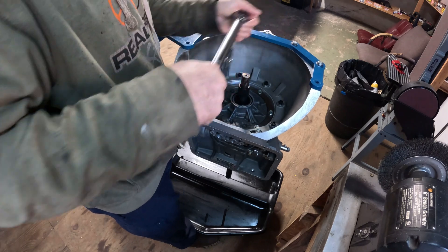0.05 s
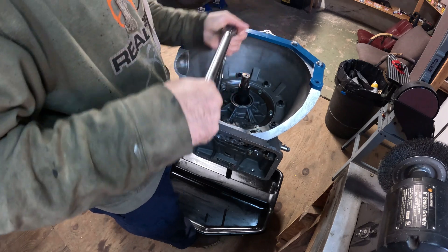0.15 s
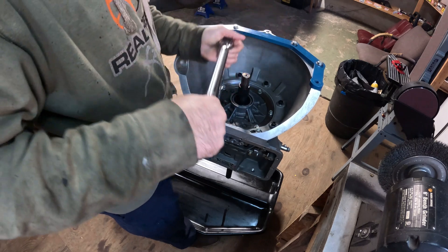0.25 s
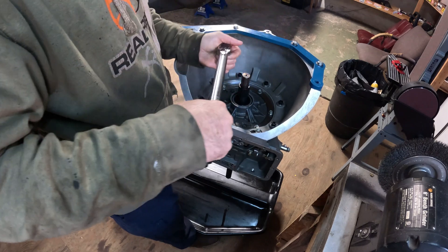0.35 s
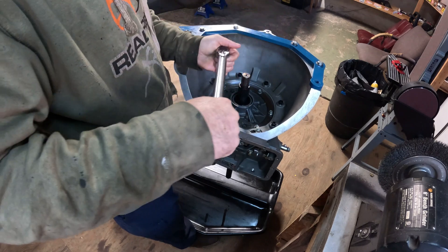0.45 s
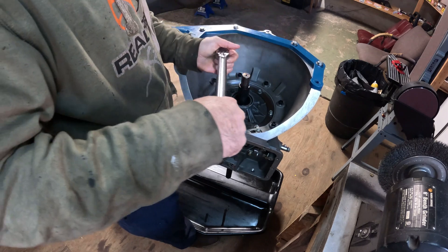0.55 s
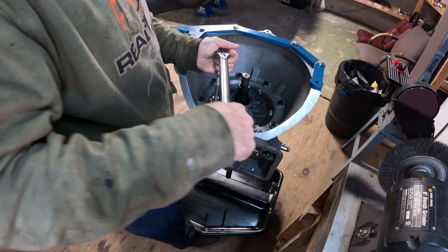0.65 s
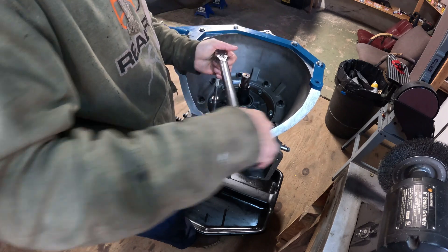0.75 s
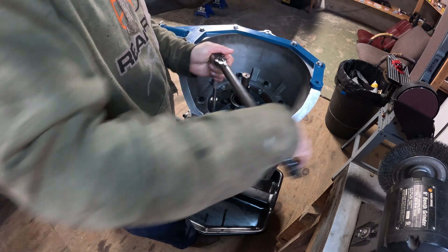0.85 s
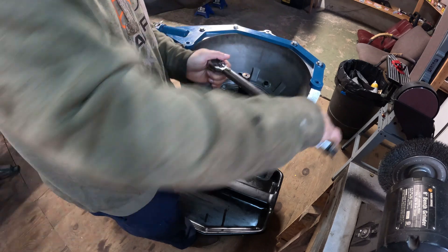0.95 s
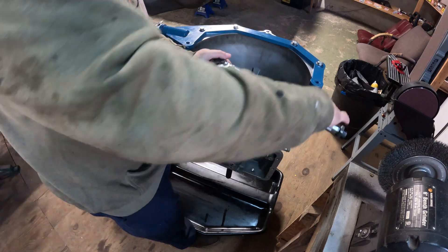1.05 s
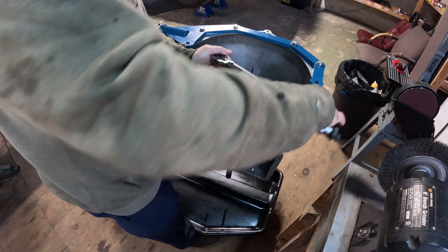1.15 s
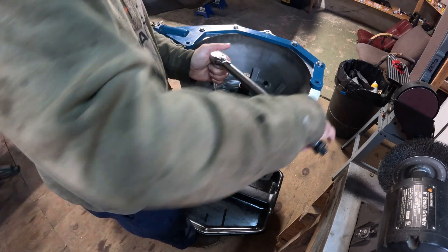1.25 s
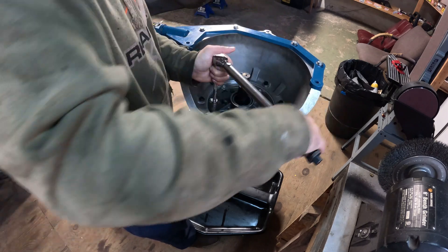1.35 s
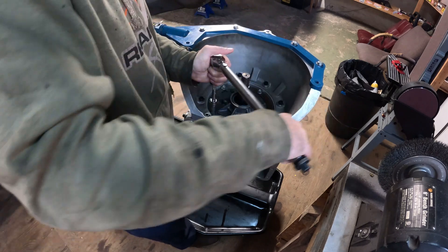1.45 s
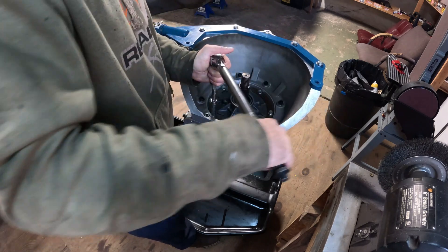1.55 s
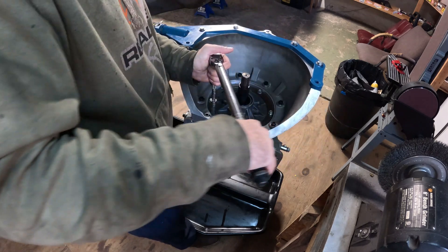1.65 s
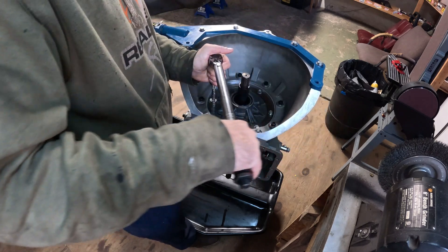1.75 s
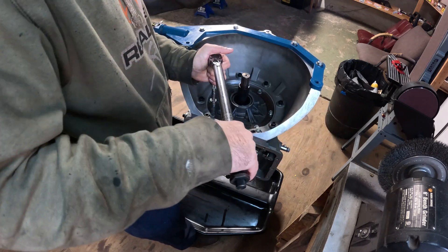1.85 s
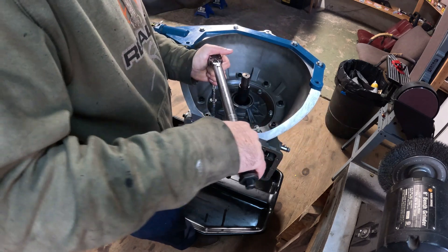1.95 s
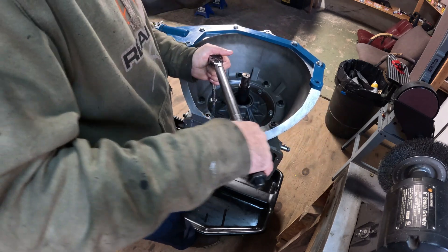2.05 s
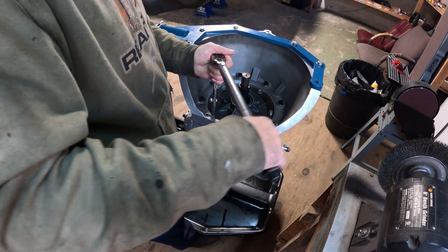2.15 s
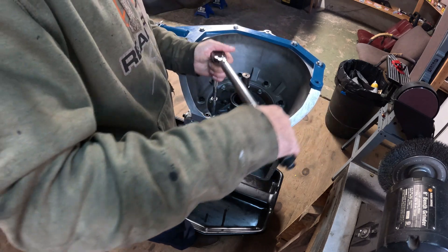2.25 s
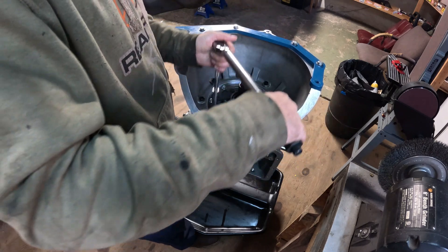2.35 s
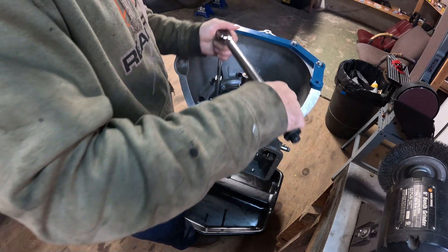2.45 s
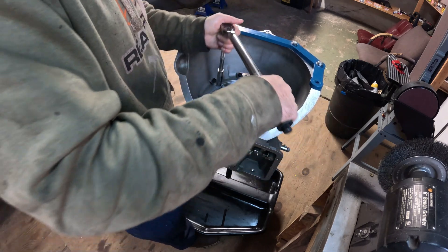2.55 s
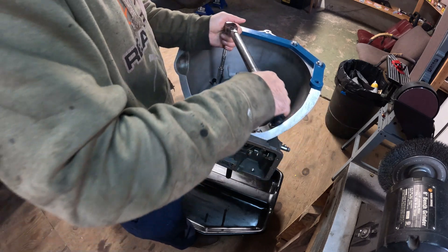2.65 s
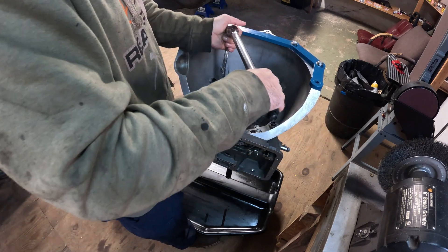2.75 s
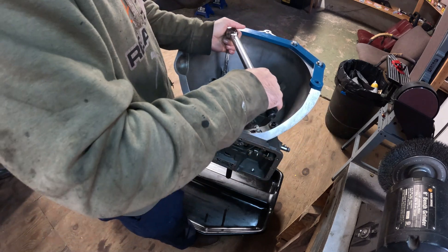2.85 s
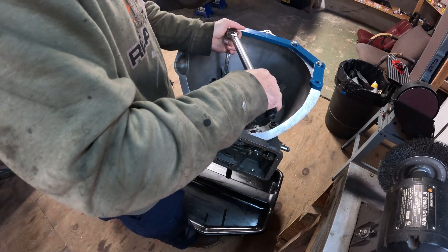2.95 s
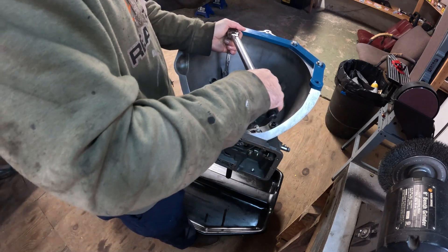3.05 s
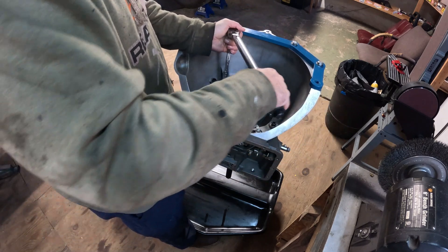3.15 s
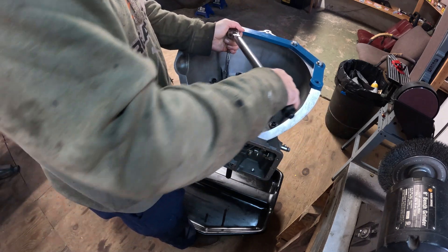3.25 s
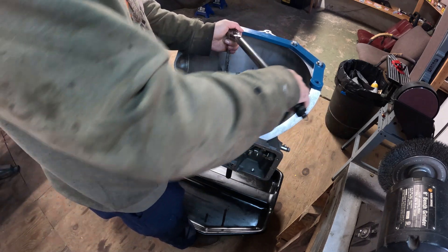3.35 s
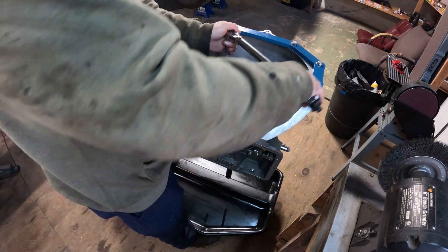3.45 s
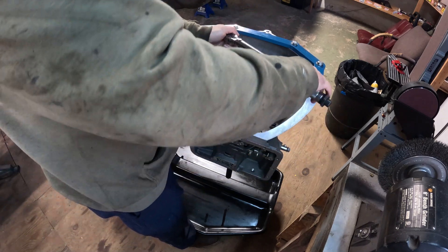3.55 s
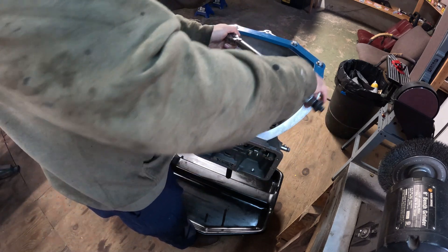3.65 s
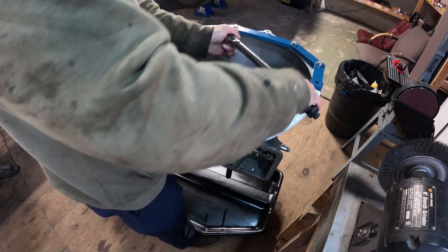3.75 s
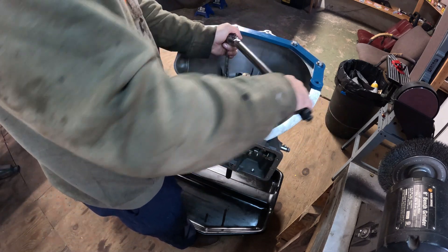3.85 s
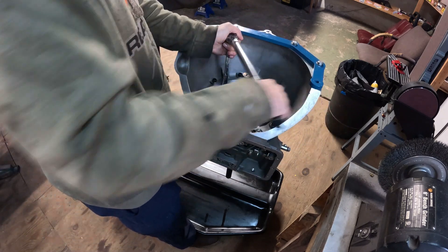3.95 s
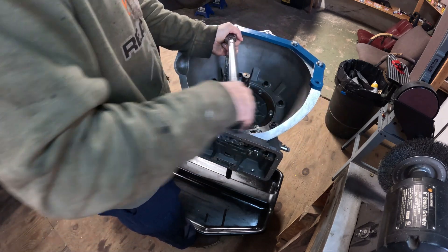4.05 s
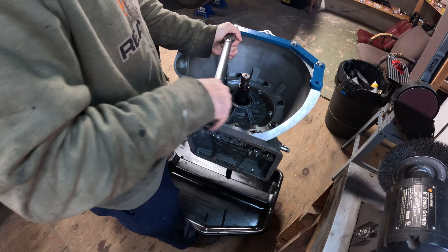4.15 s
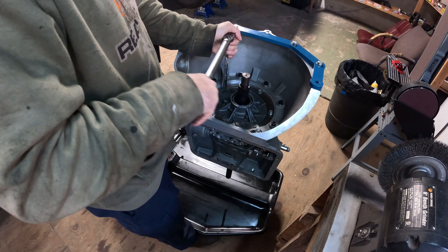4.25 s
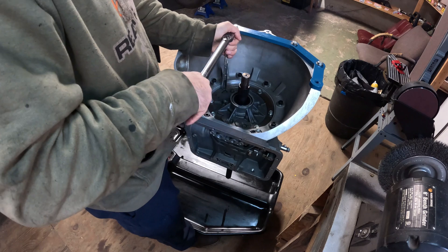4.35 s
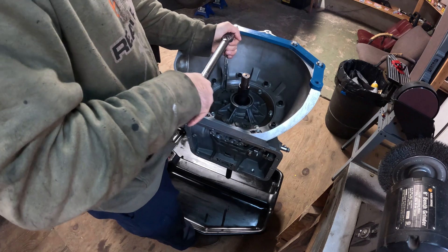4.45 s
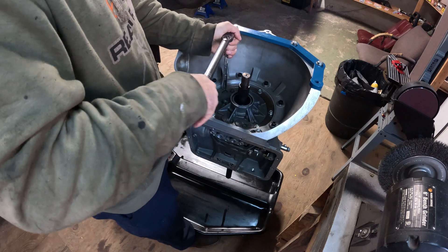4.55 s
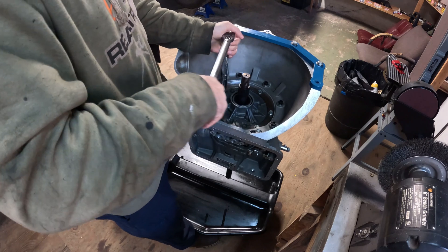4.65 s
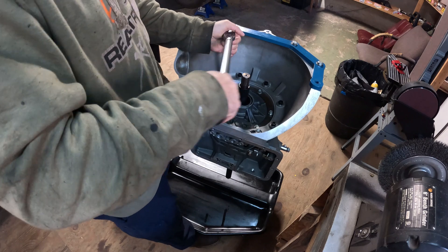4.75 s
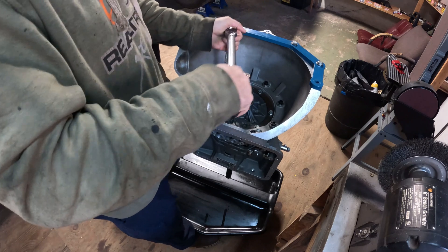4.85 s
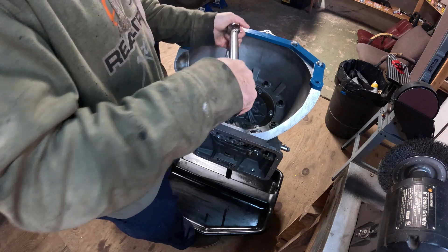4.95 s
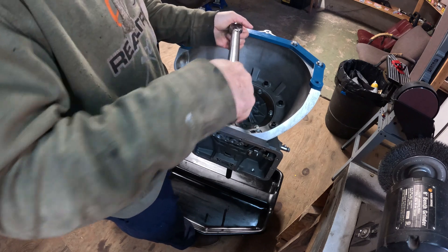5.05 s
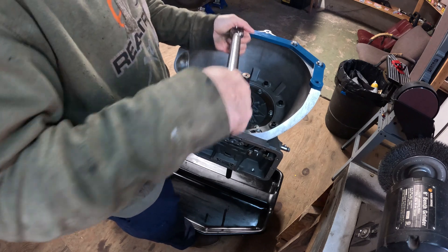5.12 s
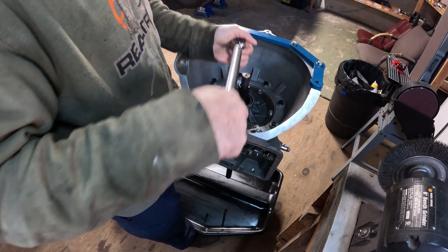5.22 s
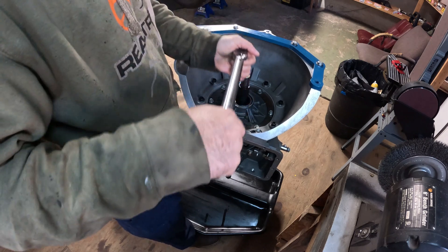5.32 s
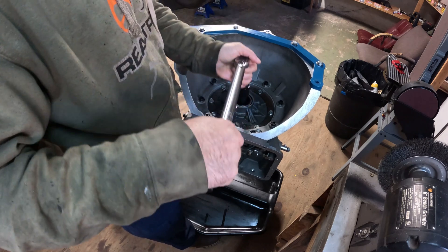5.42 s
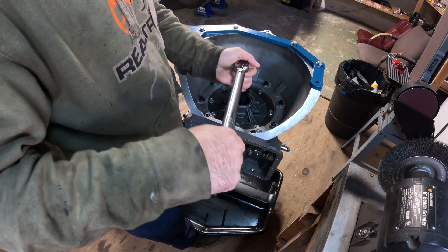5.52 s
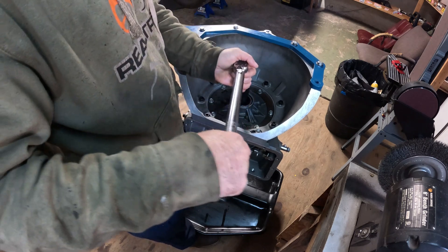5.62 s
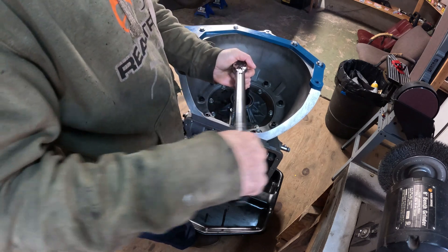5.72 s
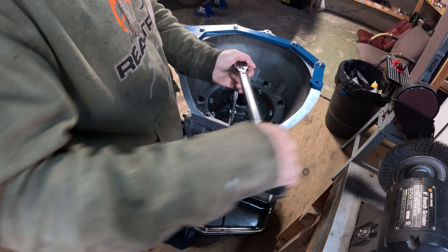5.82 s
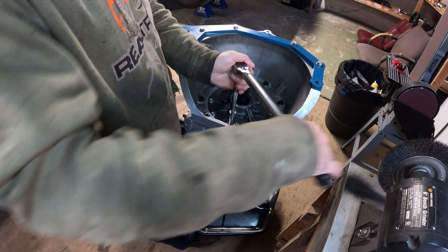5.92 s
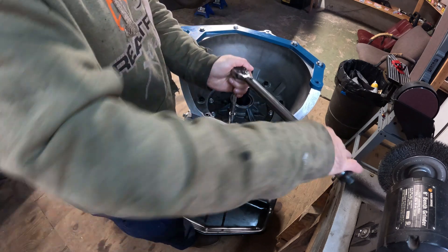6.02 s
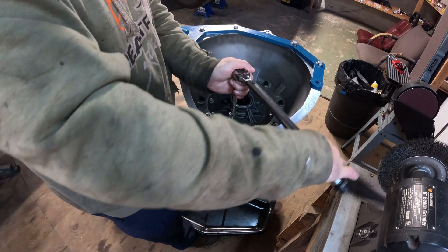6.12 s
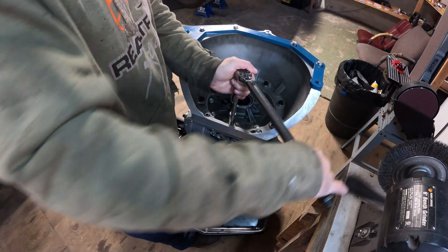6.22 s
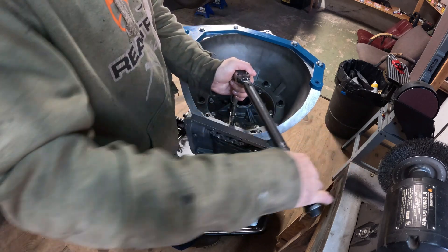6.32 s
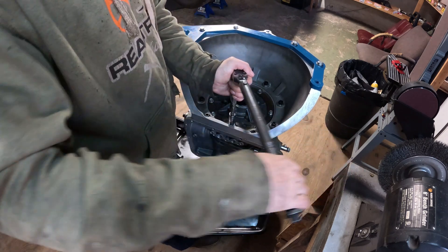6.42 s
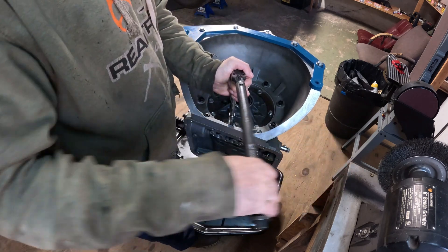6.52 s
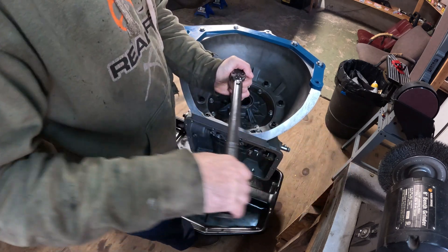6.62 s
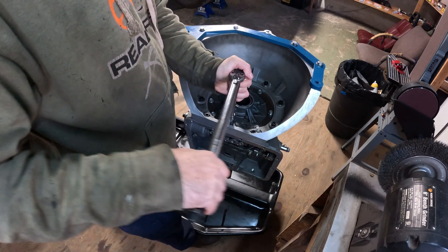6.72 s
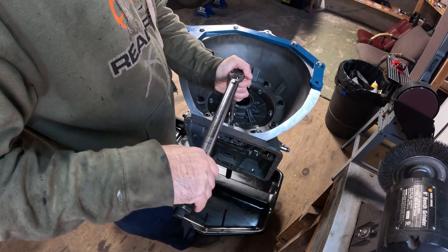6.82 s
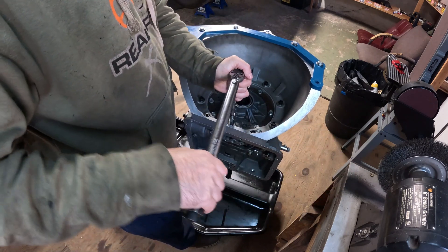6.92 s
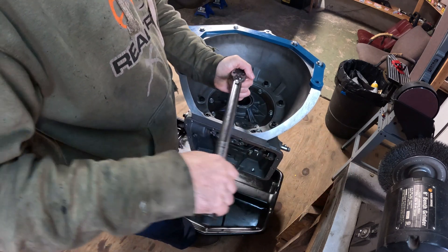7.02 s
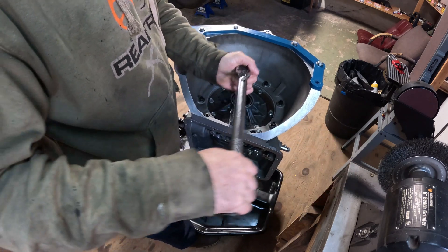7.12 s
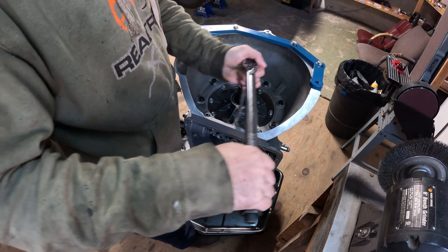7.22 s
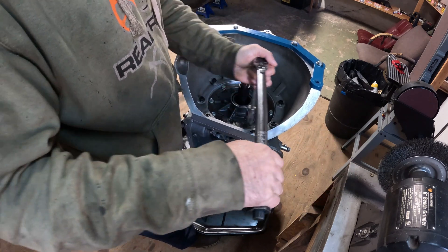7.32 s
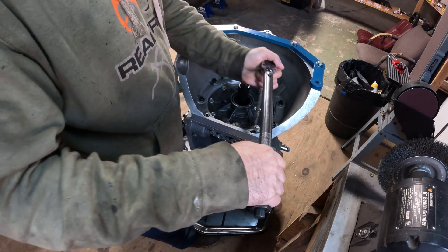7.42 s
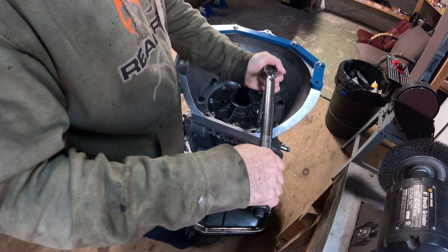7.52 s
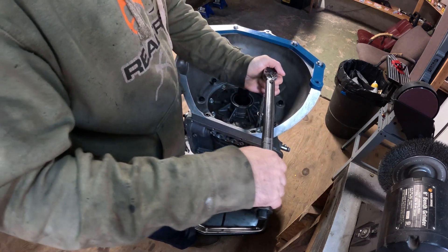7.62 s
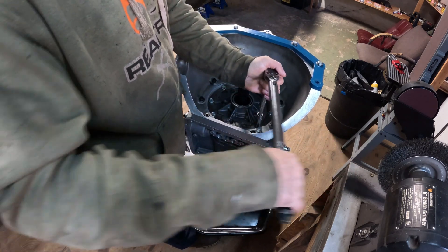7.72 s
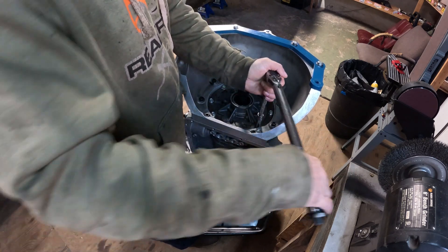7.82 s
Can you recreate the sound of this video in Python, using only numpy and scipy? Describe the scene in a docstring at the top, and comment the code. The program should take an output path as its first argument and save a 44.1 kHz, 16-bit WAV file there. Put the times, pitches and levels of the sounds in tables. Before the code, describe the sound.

Close metallic knocks, short bursts of ratchet clicks and three loud steel snaps from a torque wrench, with low casing rumbles and soft sleeve rustle.

```python
"""A torque wrench tightens bolts in a gearbox bell housing on a wooden bench, over a soft room hum and rustling sleeves.
First the socket knocks onto a bolt (struck modes), and the ratchet clicks on the back swing (short bright impacts).
The wrench then breaks over with a ringing snap (an impact exciting the tube), and the gearbox rocks (swaying low noise).
Firmer knocks lead to a second snap; more knocks and a run of clicks lead to a third.
Last, the socket knocks a few more times with a strong ring."""
import sys
import numpy as np
from scipy import signal
from scipy.fft import rfft, irfft, next_fast_len
from scipy.io import wavfile
from scipy.ndimage import uniform_filter1d

SR = 44100
rng = np.random.default_rng(int(sys.argv[2]) if len(sys.argv) > 2 else 0)


def dump_mix(stems):
    """Bounce the given channels to the path in sys.argv[1] as a 16-bit WAV at rate SR."""
    frames = np.atleast_2d(stems).T  # one column per channel
    limited = np.clip(frames, -1, 1)  # hard clip at full scale
    pcm = np.round(limited * 32767).astype(np.int16)
    wavfile.write(sys.argv[1], SR, pcm)


N = 347508
TIME = np.arange(N) / SR  # s


def from_db(db):
    """Amplitude ratio: decibels to gain."""
    return 10 ** (np.asarray(db) / 20)


def rms_one(x):
    """Normalization: scale to an rms of 1."""
    return x / np.sqrt(np.mean(x ** 2) + 1e-20)


def at_hz(points, hz):
    """Interpolation of a spectrum along a log-frequency axis."""
    known_hz, values = np.transpose(points)
    return np.interp(np.log(np.maximum(hz, 1)), np.log(known_hz), values)


def dying(t, t60):
    """Exponential decay: 60 dB down after t60 seconds."""
    return np.exp(-np.log(1000) * t / t60)


def add(track, s, sound):
    """Superposition: mix a sound into the track at time s."""
    start = int(s * SR)
    track[..., start:start + sound.shape[-1]] += sound[..., :N - start]


def coloured_noise(colour, size):
    """Spectral shaping: white noise filtered to a given spectrum, rms 1."""
    spectrum = rfft(rng.standard_normal(size))
    gain = from_db(at_hz(colour, np.fft.rfftfreq(size, 1 / SR)))
    return rms_one(irfft(spectrum * gain, size))


def spread(mid, side, side_db):
    """Sum and difference: left and right from a shared and an opposed part."""
    return mid + from_db(side_db) * side * np.array([[1], [-1]])


def background(colour, side_db):
    """Diffuse field: noise that differs between the ears, except in the deep bass."""
    bass_cut = signal.butter(2, 130, "high", fs=SR, output="sos")
    side = signal.sosfilt(bass_cut, coloured_noise(colour, size=N))
    return spread(coloured_noise(colour, size=N), side, side_db)


# faint low drone of the shop: pitch_hz [Hz], level_db [dB]
DRONE_NOTES = [(97, -79.5), (160, -68.5), (235, -68)]


def drone(width_hz):
    """Narrow-band resonance: noise through sharp low peaks wavers in level."""
    out = np.zeros(N)
    for hz, db in DRONE_NOTES:
        b, a = signal.iirpeak(hz, hz / width_hz, fs=SR)
        out += from_db(db) * rms_one(signal.lfilter(b, a, rng.standard_normal(N)))
    return out


# spectrum of the room hum: pitch_hz [Hz], density_db [dB per Hz]
HUM_COLOUR = [(12, -30), (20, 5), (46, -6), (56, -11.5), (70, -29.5), (116, -25.5), (154, -15.5),
              (500, -19.5), (800, -26.5), (1190, -20.5), (1700, -25), (2600, -35), (3600, -42), (5200, -44),
              (10000, -50), (16000, -76.5)]


def room_hum():
    """Stationary noise: a steady diffuse hum with a low drone in it."""
    return from_db(-52) * background(HUM_COLOUR, side_db=-6) + drone(width_hz=3.9)


# spectrum of rustling cloth: pitch_hz [Hz], density_db [dB per Hz]
CLOTH_COLOUR = [(60, -24), (120, -9.5), (170, -3), (300, -6.5), (600, -11), (1200, -16.5), (2500, -31),
                (6000, -48), (14000, -71)]
# swings of the arm: fastest_s [s], length_s [s], level_db [dB]
SWINGS_OF_ARM = [(0.5, 1.26, -61.5), (1.62, 0.46, -62), (3.3, .9, -60), (3.6, 0.25, -53),
                 (4.28, 0.32, -61.5), (5.78, .4, -62.5), (6.83, .35, -58), (7.8, .6, -67)]


def sleeves():
    """Friction noise: cloth rustles with the speed of the arm, which gathers quickly and eases off."""
    rise = 0.39  # share of a swing spent speeding up
    power = from_db(-66.5) ** 2  # arm at rest
    for s, length, db in SWINGS_OF_ARM:
        speed = np.interp(TIME, [s - rise * length, s, s + (1 - rise) * length], [0, 1, 0])
        power = power + from_db(db) ** 2 * speed
    return np.sqrt(power) * background(CLOTH_COLOUR, side_db=-12.5)


# hand and cloth brushing the handle: start_s [s], length_s [s], level_db [dB], centre_hz [Hz], width [octaves]
HANDLE_BRUSHES = [(3.246, .04, -49.5, 804, 3.2), (4.1, 0.088, -53.5, 259.7, 2.5),
                  (5.822, .04, -41.5, 4200, 0.61)]


def brushes():
    """Granular friction: short swells of uneven grains as the grip shifts."""
    out = np.zeros(N)
    for s, length, db, hz, octaves in HANDLE_BRUSHES:
        size = int(length * SR)
        grains = rng.standard_normal(size) * from_db(3.7 * rng.standard_normal(size))
        edges = hz * 2 ** (octaves * np.array([-.5, .5]))
        band = signal.butter(2, edges, "band", fs=SR, output="sos")
        swell = np.sin(np.linspace(0, np.pi, size))
        add(out, s, from_db(db) * rms_one(signal.sosfilt(band, grains)) * swell)
    return out


# seating the socket shoves the gearbox: start_s [s], sway_db [dB], t60_s [s], thud_db [dB] (thud of the boards)
GEARBOX_SHOVES = [(0.93, -41, 0.98, -66), (3.29, -44, 0.45, -42), (3.505, -51.5, 0.35, -46.5),
                  (3.56, -31.5, 0.57, -41)]


def jolts():
    """Action and reaction: the shoves, then for each pull a lurch at the snap and a swing back on letting go."""
    # delay s, sway dB, t60 s, thud dB; levels re the pull's sway
    lurch, swing_back = (.016, 0.5, .5, -16), (.222, 3.5, 0.89, -28)
    events = list(GEARBOX_SHOVES)
    for s, _, _, pull_db in BREAKS:
        for delay_s, sway_db, t60, thud_db in (lurch, swing_back):
            events.append((s + delay_s, pull_db + sway_db, t60, pull_db + thud_db))
    return events


# spectrum of the rocking gearbox: pitch_hz [Hz], density_db [dB per Hz]
SWAY_COLOUR = [(15, -21.5), (27, 0.5), (40, -3.5), (55, -6.5), (72, -16.5), (95, -18.5), (125, -34),
               (250, -49), (600, -79.5)]
# spectrum of the thudding boards: pitch_hz [Hz], density_db [dB per Hz]
BOARD_COLOUR = [(50, -15.5), (90, 0.5), (120, -0.5), (170, 3), (240, -4.5), (320, -16), (500, -13.5),
                (800, -36), (2000, -70)]


def bench():
    """Damped oscillation: each jolt thuds in the boards and sets the gearbox swaying with a low rumble."""
    out, t = np.zeros(N), TIME[:SR]
    for s, db, t60, thud_db in jolts():
        sway = signal.hilbert(coloured_noise(SWAY_COLOUR, size=SR))
        sway = rms_one(sway.real / (abs(sway) + 0.61))  # a swinging mass keeps a fairly even swing
        rumble = from_db(db) * sway * dying(t, t60)
        thud = from_db(thud_db) * coloured_noise(BOARD_COLOUR, size=SR) * dying(t, 0.71)
        onset = 1 - np.exp(-t / 0.012)
        add(out, s, (rumble + thud) * onset)
    return out


# decay of the workshop: pitch_hz [Hz], t60_s [s]
DECAY_TIMES = [(150, 2.04), (500, 0.03), (1400, 0.99), (3700, 0.69), (7000, 0.7), (14000, 0.25)]
# strength of its echo: pitch_hz [Hz], echo_db [dB]
ECHO_LEVELS = [(150, 6.5), (400, -3.5), (1000, -6.5), (2000, -11), (4000, -11), (8000, -16), (14000, -9)]


def workshop(x, early_db, early_t60, side_db):
    """Reverberation: scatter from close clutter fades fast over a tail that dies band by band."""
    t, edges, response = TIME[:SR], np.geomspace(100, 16000, num=12), 0
    white = spread(*rng.standard_normal((2, SR)), side_db) / np.sqrt(SR)
    for low, high in zip(edges, edges[1:]):
        hz = np.sqrt(low * high)
        t60 = at_hz(DECAY_TIMES, hz)
        band_filter = signal.butter(2, [low, high], "band", fs=SR, output="sos")
        band = signal.sosfilt(band_filter, np.roll(white, int(hz), axis=-1))  # shifted noise for each band
        fade = dying(t, t60) + from_db(early_db) * dying(t, early_t60)
        energy_norm = np.sqrt(2 * np.log(1000) / t60)  # long tails start softer
        response = response + band * fade * from_db(at_hz(ECHO_LEVELS, hz)) * energy_norm
    response = response * np.clip((t - .002) / 0.006, 0, 1)  # echoes enter from 2 to 8 ms
    return signal.fftconvolve(x[None], response, axes=-1)[:, :N]


# balance of the wrench between the microphone ports: pitch_hz [Hz], left_minus_right_db [dB]
PORT_BALANCE = [(300, 0), (1000, -3), (2500, -5.5), (5000, -2.1), (8500, 0), (12000, 3.5)]


def microphones(x, lag_s):
    """Interaural difference: the left port hears the wrench later, at a balance that changes with pitch."""
    size = next_fast_len(N + SR)
    hz = np.fft.rfftfreq(size, 1 / SR)
    half = from_db(at_hz(PORT_BALANCE, hz) / 2) * np.exp(-1j * np.pi * hz * lag_s)
    return irfft(rfft(x, size) * np.array([half, 1 / half]), size)[:, :N]


def body_response(gain_db):
    """Minimum phase: the causal frequency response of a body with this gain curve."""
    cepstrum = irfft(np.log(from_db(gain_db)))
    half = len(cepstrum) // 2
    cepstrum[1:half] *= 2
    cepstrum[half + 1:] = 0
    return np.exp(rfft(cepstrum))


def contact(colour, level_db, tint_db, t60, rise_s, crack, ring_hz=1500, ring_db=0, ring_width_hz=170, size=4096):
    """Impact excitation: a crack and a few ms of dense chatter, shaped by a given spectrum."""
    t, hz = TIME[:size], np.fft.rfftfreq(size, 1 / SR)
    force = rng.standard_normal(size) * dying(t, t60) * (1 - np.exp(-t / rise_s))
    force /= np.linalg.norm(force)
    force[0] += crack
    force = rfft(force)
    even = -10 * np.log10(uniform_filter1d(abs(force) ** 2, size=48))  # the blow feeds all pitches alike
    bass, body, treble = tint_db
    tint = at_hz([(700, bass), (1000, body), (2000, body), (2800, 0), (5200, 0), (7000, treble)], hz)
    peak = 1 / (1 + ((hz - ring_hz) / ring_width_hz) ** 2)
    broad_dip = 0.28 / (1 + ((hz - ring_hz) / 700) ** 2)
    ring = ring_db * (peak - broad_dip)
    sound = irfft(force * body_response(at_hz(colour, hz) + even + tint + ring)) * np.linspace(1, 0, size)
    return from_db(level_db) * sound / np.sqrt(np.sum(sound ** 2) / (SR / 100))  # energy as rms over 10 ms


# steel tube of the wrench with its socket, and the bolted housing (501 Hz): pitch_hz [Hz], level_db [dB], t60_s
# [s]
TUBE_MODES = [(501, -24.5, 0.16), (2320, -23, 0.45), (2770, -22.5, 0.46), (3400, -26.5, .35),
              (3640, -21, .3), (3700, -19, 0.45), (3870, -14.5, 0.24), (3830, -17.5, 0.38),
              (3910, -19, 0.51), (6500, -28.5, 0.4), (7760, -34, .35), (8300, -31.5, .3),
              (10050, -17, 0.17), (13830, -34.5, .25)]


def tube_ring(level_db, scatter_db, count=12):
    """Modal splitting: loose joints split each mode into a beating cluster, fed anew by every blow."""
    t, out = TIME[:SR // 2], 0
    split_hz = 65  # spread of the cluster around each mode
    bins = SR // 2 + 1  # 1 Hz apart
    for hz, db, t60 in TUBE_MODES:
        pitches = np.clip(hz + split_hz * rng.standard_normal(count), 1, SR / 2 - 1).astype(int)
        partials = np.zeros(bins, complex)
        partials[pitches] = np.exp(2j * np.pi * rng.random(count))
        cluster = rms_one(irfft(partials, SR)[:len(t)]) / np.sqrt(2)
        gain = from_db(level_db + db + scatter_db * rng.normal())
        out = out + gain * cluster * dying(t, t60)
    return out


# hollow ring of the bell housing: pitch_hz [Hz], level_db [dB], t60_s [s]
BELL_MODES = [(161, -5.5, 0.3), (236.2, -1, 0.16), (354, -5.5, 0.15), (395, -6.5, .3), (501, 0.5, .22)]


def housing_ring(level_db):
    """Modal synthesis: the casting answers a knock with a few low decaying modes."""
    t, modes = TIME[:SR], 0
    for hz, db, t60 in BELL_MODES:
        modes = modes + from_db(db) * np.sin(2 * np.pi * (hz * t + rng.random())) * dying(t, t60)
    return from_db(level_db) * modes * (1 - np.exp(-t / .003))


# faint short ticks: start_s [s], level_db [dB before a common 5.5 dB cut], treble_db [dB]
FAINT_TICKS = [(1.255, -49.5, 11), (1.536, -55, -1), (1.725, -42, -4.5), (2.2914, -53, -12.5),
               (4.008, -49, 8.5), (4.2452, -50.5, 4), (4.278, -45.5, -3.5), (4.7306, -46, -3),
               (4.842, -52, -11.5), (6.547, -54.5, 4.5), (6.721, -42.5, -4.5), (7.06, -56, 21),
               (7.5677, -41, -7), (7.8627, -43, -15)]


def ticks():
    """Transient noise: faint short ticks, each a brief burst with a treble of its own."""
    out = np.zeros(N)
    for s, db, treble_db in FAINT_TICKS:
        add(out, s, contact(BREAK_COLOUR, db - 5.5, (0, -3, treble_db), t60=0.021, rise_s=.0005, crack=0.18))
    return out


# spectrum of a knock: pitch_hz [Hz], density_db [dB per Hz]
SOCKET_COLOUR = [(200, -19.5), (420, -8), (700, -15), (850, -14.5), (1020, 0), (1300, -5.5), (1700, -2),
                 (2900, 0.5), (3800, -2), (5200, -3), (7000, -6.5), (9000, -19), (12000, -41.5),
                 (16000, -55.5)]
# socket and drive knocking on bolt and housing: start_s [s], level_db [dB], dullness_db [dB], ring_hz [Hz], ring_db [dB]
SOCKET_KNOCKS = [(0.5213, -32.5, 9, 1600, 14), (0.532, -30, -5.5, 995, 17.5),
                 (0.5463, -39.5, -4.5, 976, 13), (0.9247, -24.5, 12, 1545, 13),
                 (1.2564, -38, 14, 1120, 3.5), (1.9409, -37, 4.5, 1670, 8), (2.9184, -28.5, 6, 1720, 8),
                 (3.2761, -33, 7.5, 2128, -1), (3.288, -21.5, -7, 3500, 8), (3.5032, -23, -2.5, 1586, 3),
                 (3.5586, -18.5, -0.5, 2497, -1), (4.52, -49, 1, 2000, -4), (4.779, -47.5, 1, 2330, 7),
                 (5.5544, -27, 5, 2200, 3), (5.5779, -25, 0, 2210, 5.5), (5.8356, -28.5, -14, 2376, 3.5),
                 (5.8425, -29, -2.5, 1560, 3.5), (5.851, -38, 15, 1790, 1), (6.163, -48, 13, 1700, 7),
                 (6.4, -46, 9.5, 2100, -0.5), (6.9428, -37, 8.5, 2140, 2), (7.579, -19, -7.5, 1530, 29.5),
                 (7.611, -29, 0, 1540, 2), (7.616, -27.5, -11, 1600, 8), (7.6444, -19.5, -3.5, 1510, 18)]


def socket():
    """Coupled impact: knocks ring at a pitch set by how the socket sits, and stir tube and housing."""
    out = np.zeros(N)
    for s, db, dull_db, hz, ring_db in SOCKET_KNOCKS:
        force_db = db + 21.5  # re a firm knock
        softness = from_db(-.35 * force_db)  # gentle knocks slide and chatter for longer
        treble_db = -3.5 + 0.84 * force_db  # gentle knocks lose treble
        add(out, s, contact(SOCKET_COLOUR, db, (dull_db - 1, dull_db, treble_db), t60=.019 * softness,
                            rise_s=0.00048 * softness, crack=0.18, ring_hz=hz, ring_db=ring_db))
        add(out, s, tube_ring(db - 22, scatter_db=1.0))
        add(out, s, housing_ring(db - 28.5 + .4 * dull_db))  # dull knocks carry further into the casting
    return out


# spectrum of a click: pitch_hz [Hz], density_db [dB per Hz]
CLICK_COLOUR = [(150, -58), (250, -30), (476, -30), (748, -38), (988, -31), (1950, -20.5), (2860, -9),
                (3170, -14), (3400, -9), (4410, -0.5), (5630, -14), (7440, -10.5), (9830, -20.5),
                (13400, -40), (16000, -54)]
# back swings; a socket seated on its bolt gives fuller clicks: start_s [s], bass_db [dB], treble_db [dB]
SWINGS_BACK = [(0.7, 1.5, 1), (5.8, -16.5, -1.5)]
# pawl dropping over a tooth: start_s [s], level_db [dB before a common trim], body_db [dB], ring_hz [Hz]
PAWL_DROPS = [(0.7856, -23.5, 7, 4790), (0.848, -21.5, 5.5, 2900), (0.887, -20.5, 2.5, 3420),
              (0.9129, -22, 1.5, 2500), (0.953, -20, -5.5, 4490), (0.9874, -21, -4.5, 4230),
              (1.0261, -20.5, -3, 4090), (5.9141, -20, -5, 5080), (5.9621, -20.5, -2.5, 2840),
              (6.0076, -19.5, 0, 4390), (6.0723, -20, -1.5, 3840)]


def ratchet():
    """Impulsive contact: the pawl clicks short and bright, each tooth at its own pitch, and barely stirs the tube."""
    out = np.zeros(N)
    for s, db, body_db, hz in PAWL_DROPS:
        _, bass_db, treble_db = [swing for swing in SWINGS_BACK if swing[0] < s][-1]
        add(out, s, contact(CLICK_COLOUR, db + 0.25, (bass_db, body_db, treble_db), t60=0.018, rise_s=0.000074,
                            crack=1.0, ring_hz=hz, ring_db=7, ring_width_hz=230))
        add(out, s, tube_ring(db - 17.5, scatter_db=2.5))
    return out


# notes of the steel that sing until the grip damps them: start_s [s], pitch_hz [Hz], level_db [dB], free_s [s until damped]
STEEL_NOTES = [(4.288, 4931, -38, 0.16), (6.731, 2860, -35, 0.057), (6.733, 4900, -40, 0.185)]


def singing(split_hz, twin_db):
    """Beats: each note is a close pair of modes, until the hand chokes them."""
    out, t = np.zeros(N), TIME[:SR]
    free_t60, grip_t60 = 0.96, 0.17  # s; the grip's damping adds to the free decay
    for s, hz, db, free_s in STEEL_NOTES:
        twin = np.sin(2 * np.pi * ((hz + split_hz) * t + rng.random()))
        pair = np.sin(2 * np.pi * hz * t) + from_db(twin_db) * twin
        choke = dying(np.maximum(t - free_s, 0), grip_t60)
        add(out, s, from_db(db) * pair * dying(t, free_t60) * choke)
    return out


# spectrum of a snap, shared by the ticks: pitch_hz [Hz], density_db [dB per Hz]
BREAK_COLOUR = [(200, -35), (460, -13.5), (750, -18.5), (1050, -2.5), (1400, -2), (1800, 0.5), (2800, -1.5),
                (3300, -1.5), (3800, 4.5), (4500, -6), (6600, -5.5), (9000, -10), (12000, -24),
                (16000, -42)]
# wrench breaking over at the set torque:
# start_s [s], level_db [dB before a common trim], ring_hz [Hz], sway_db [dB, reference for the gearbox's jolts]
BREAKS = [(1.7363, -18, 3845, -34.5), (4.2872, -18.5, 4350, -36), (6.7325, -16, 2840, -33)]


def break_over():
    """Sudden release: the spring-loaded toggle slips, slaps the inside of the tube and makes it ring."""
    out = np.zeros(N)
    for s, db, hz, _ in BREAKS:
        add(out, s, contact(BREAK_COLOUR, db + 0.51, (0, -3.5, 1.5), t60=0.044, rise_s=0.00044,
                            crack=0.15, ring_hz=hz, ring_db=8.5))
        add(out, s, tube_ring(db - 3.5, scatter_db=3.0))
    return out


def scene():
    """Direct and reverberant field: the wrench works close by, over the sound of the room."""
    pawl, snaps, knocks, rubs = ratchet(), break_over(), socket() + ticks(), brushes()
    notes = singing(split_hz=25, twin_db=-8.5)
    direct = microphones(pawl + snaps + knocks + rubs + notes, lag_s=1 / (2 * SR))
    sent = from_db(-4.5) * pawl + from_db(-1.0) * snaps + from_db(-0.85) * knocks + rubs + from_db(-8.5) * notes
    room = workshop(sent, early_db=6.5, early_t60=0.088, side_db=-7.0)
    return direct + room + bench() + sleeves() + room_hum()


def record(dry):
    """Band limiting: an elliptic low-pass cuts steeply above 16 kHz."""
    return signal.sosfilt(signal.ellip(10, .1, 80, 16000, fs=SR, output="sos"), dry)


dry = scene()
out = record(dry)
dump_mix(out)
```